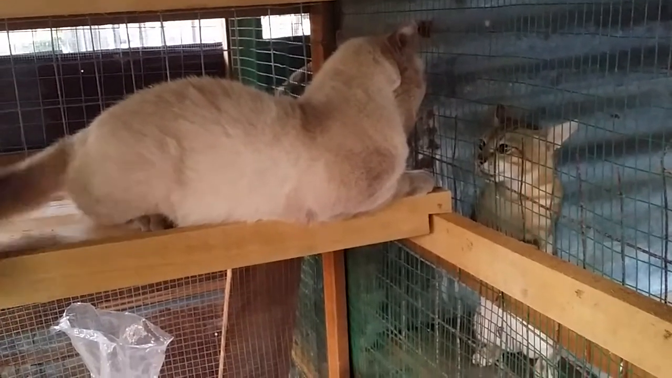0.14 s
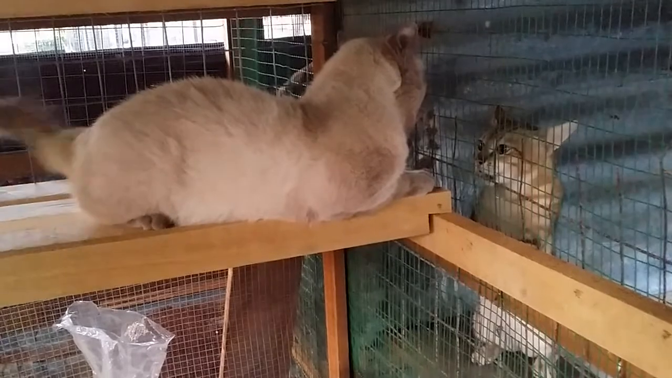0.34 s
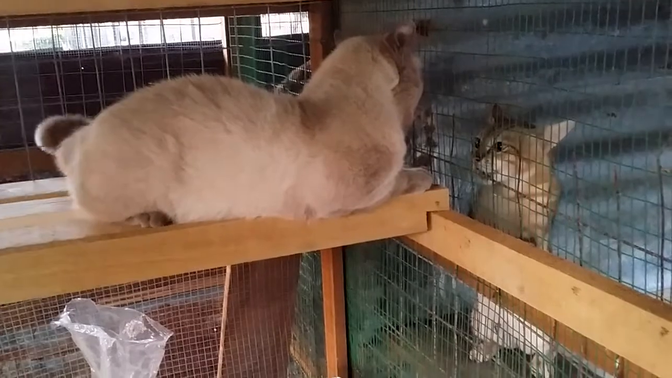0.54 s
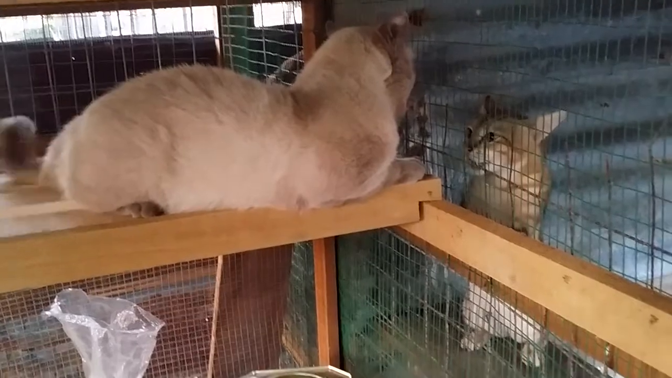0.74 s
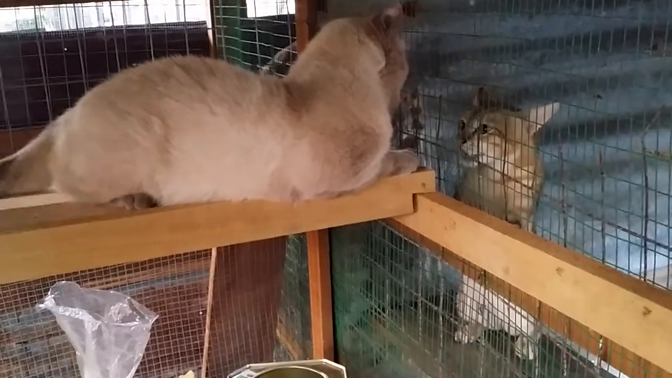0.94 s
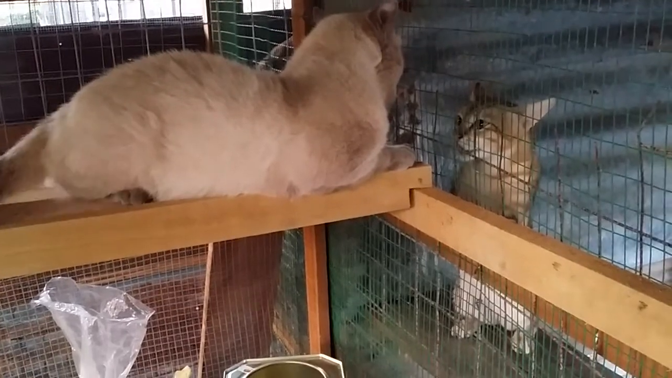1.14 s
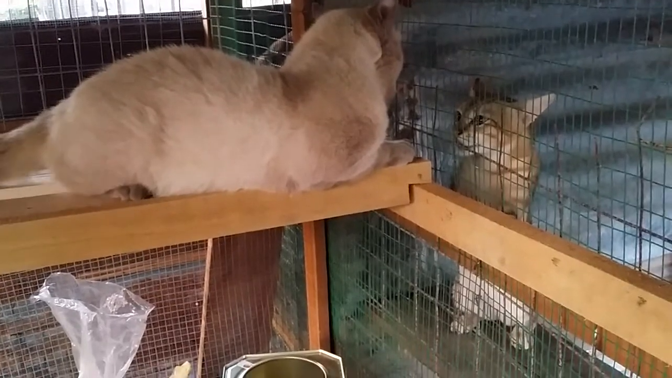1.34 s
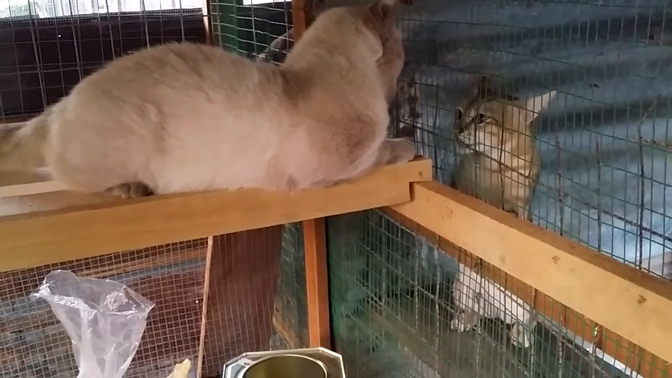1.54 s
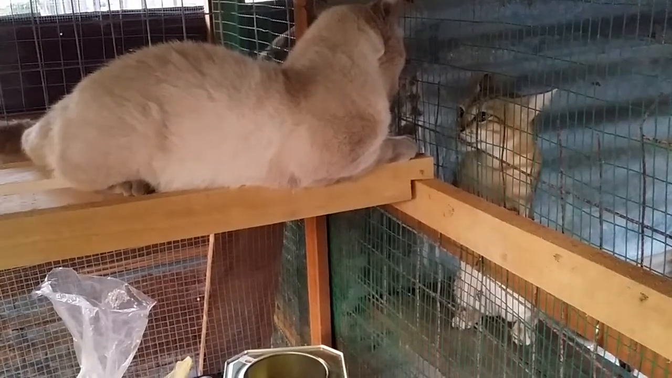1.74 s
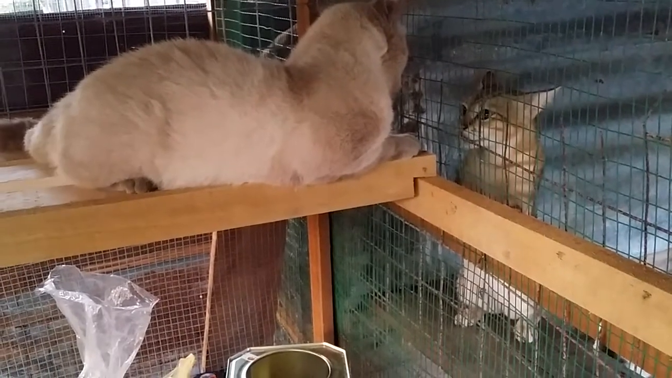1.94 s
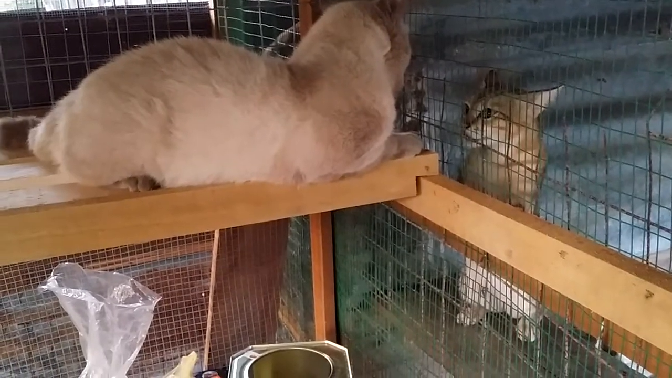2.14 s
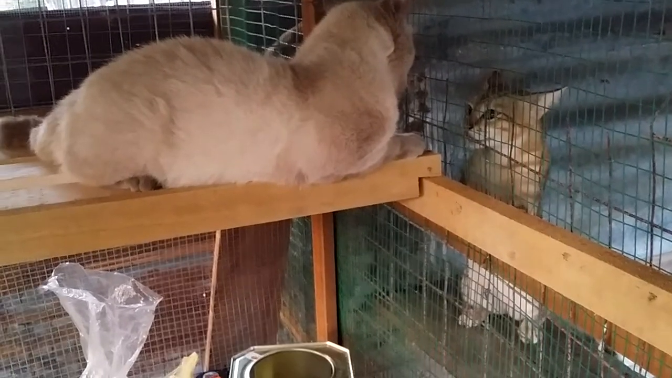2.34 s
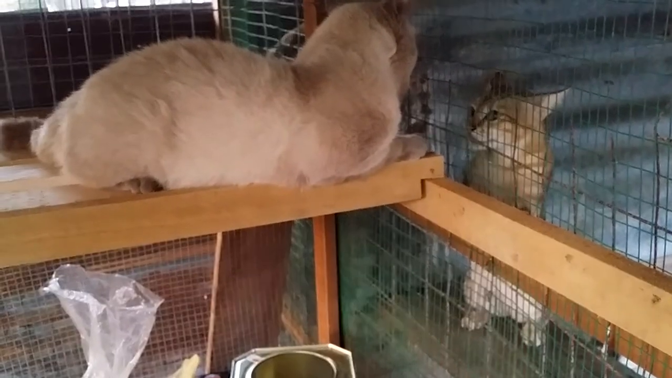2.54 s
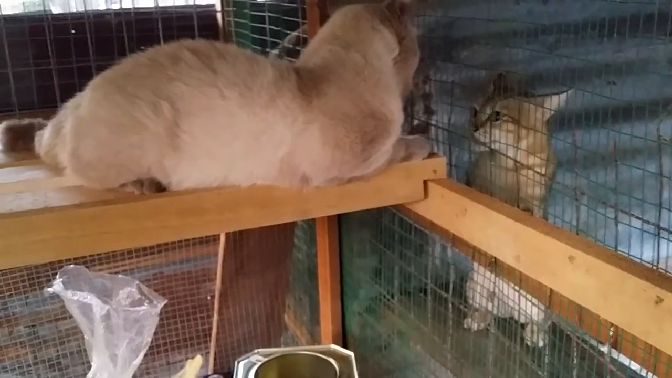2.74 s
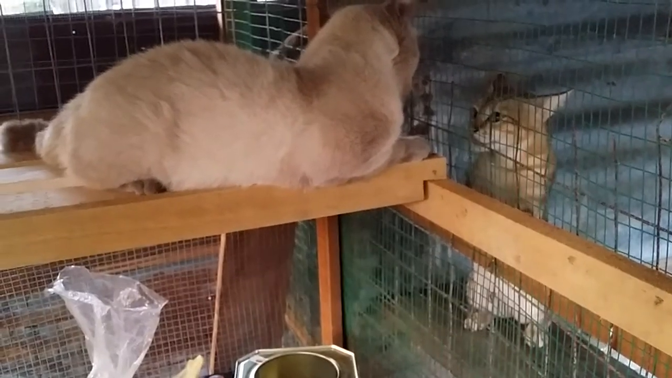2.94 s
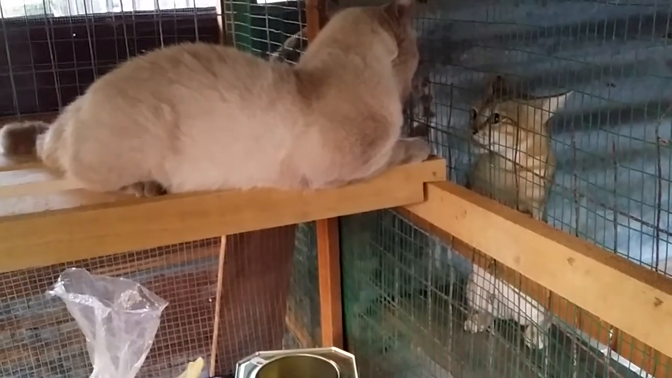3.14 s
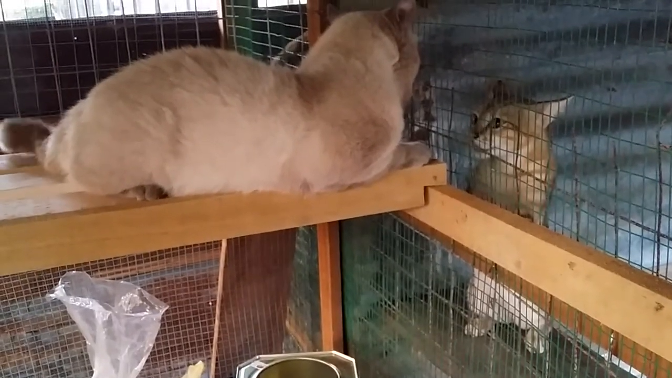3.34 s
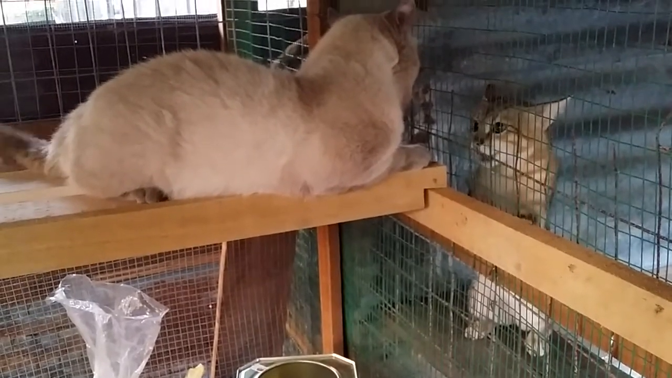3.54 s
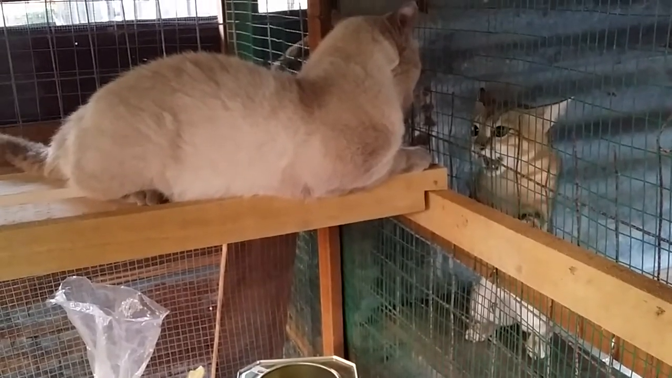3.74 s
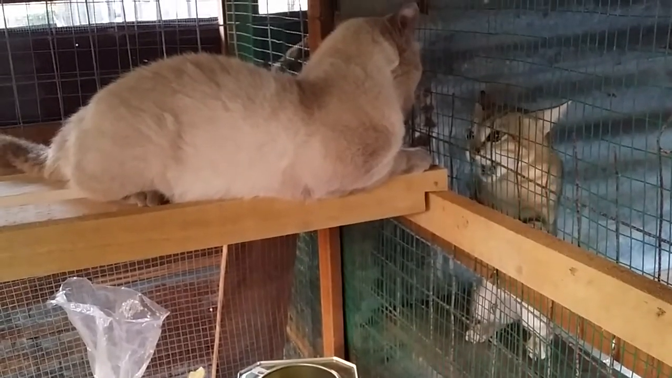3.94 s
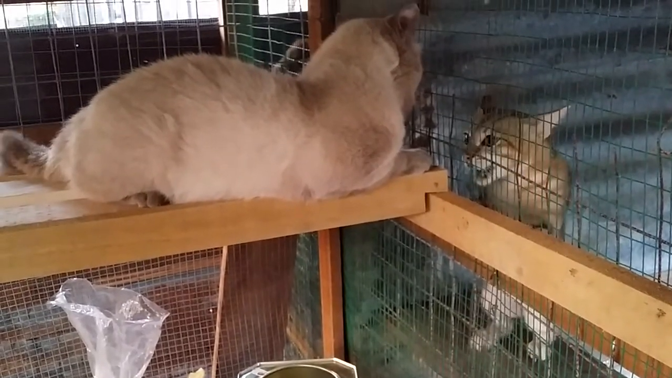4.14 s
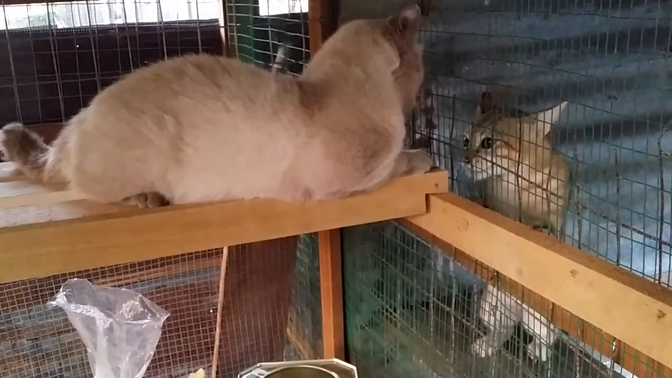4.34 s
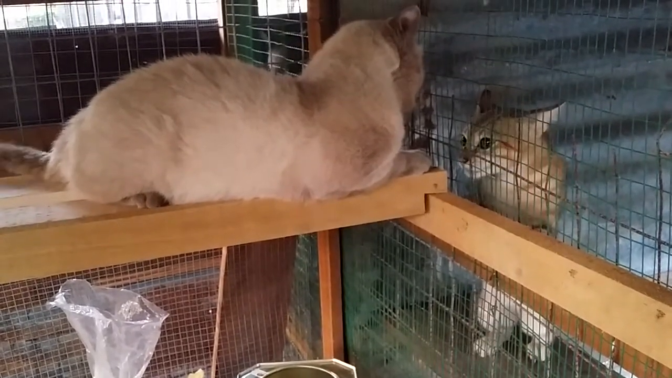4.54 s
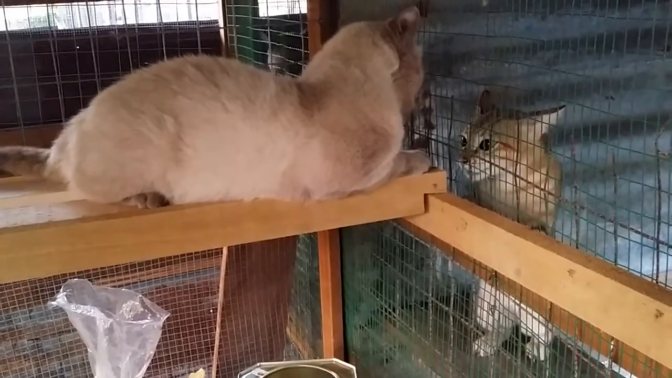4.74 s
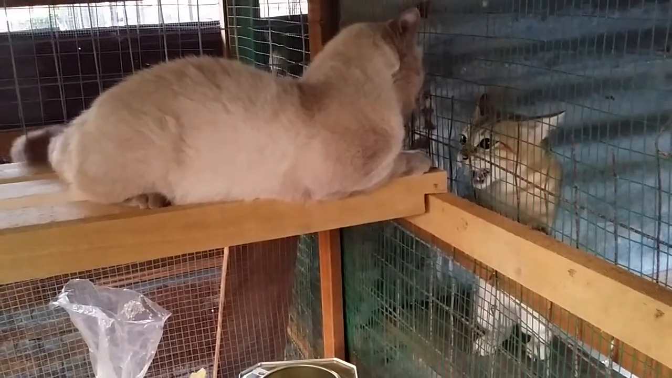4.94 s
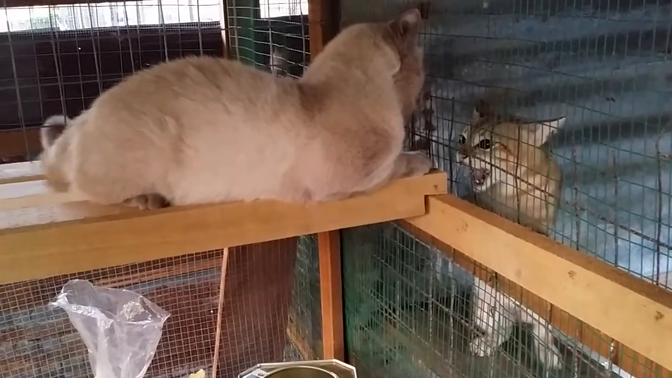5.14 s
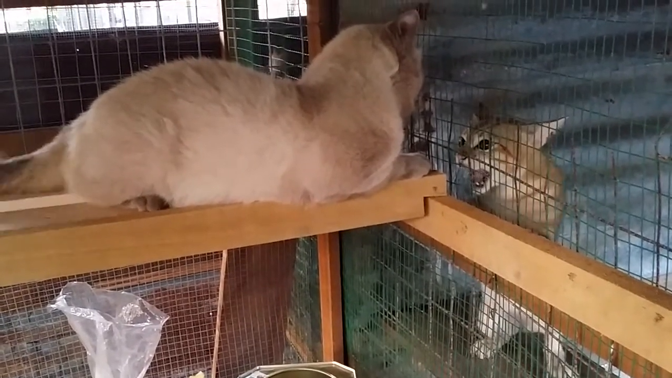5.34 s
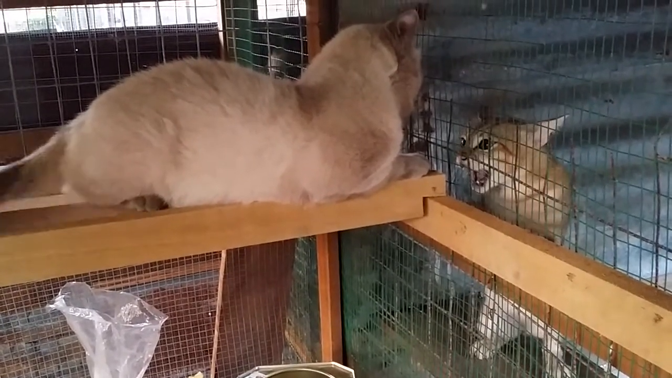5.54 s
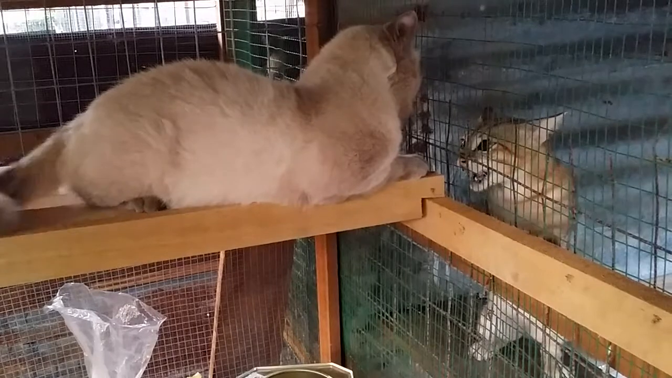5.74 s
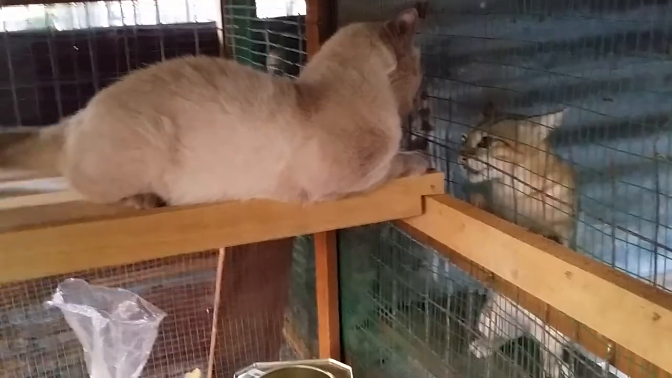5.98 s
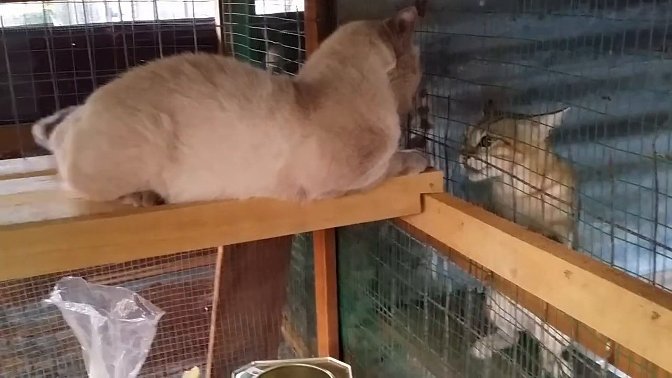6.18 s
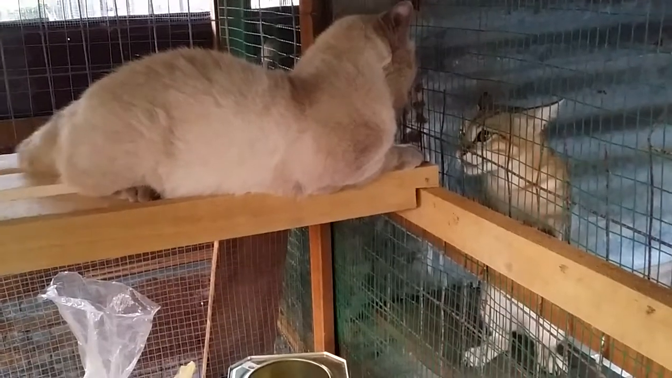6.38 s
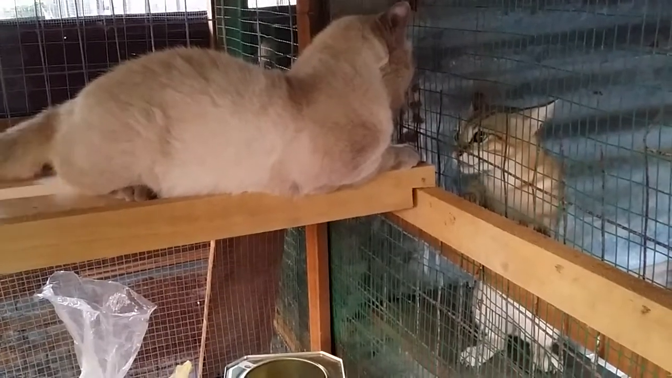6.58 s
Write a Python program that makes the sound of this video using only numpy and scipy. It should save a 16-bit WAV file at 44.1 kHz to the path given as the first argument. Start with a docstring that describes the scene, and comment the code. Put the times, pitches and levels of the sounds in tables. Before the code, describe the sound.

Three angry cat yowls are heard close by, separated by pauses in which grainy rustles and one soft tick can be made out. Each cry opens bright and raspy, bends in pitch and fades as the mouth closes. A far bird whistles thinly three times. Short, boxy reflections with a faint metallic ring; a nearby stereo microphone also picks up steady hiss and wavering bass rumble.

```python
"""Hiss and a low rumble run throughout: noise whose bass swells and sinks at random.
A cat yowls at a rival in a pen of wood, wire and sheet metal: pitched harmonics through a moving mouth.
The yowl opens into a bright, partly harsh "aow" and closes into a soft hoot; grainy noise rustles.
A noise tick follows, then a far bird chirps thinly (gliding sine), as it does twice more later.
A second yowl comes, then a third that again closes into a hoot; rustles go on between and after."""
import sys
import numpy as np
from scipy import signal
from scipy.fft import rfft, irfft, next_fast_len
from scipy.io import wavfile
from scipy.ndimage import uniform_filter1d

SR = 44100
rng = np.random.default_rng(int(sys.argv[2]) if len(sys.argv) > 2 else 0)


def wav_out(sig):
    """Save sig, one row per channel (or a flat mono array), as 16-bit PCM at SR to the path in sys.argv[1]."""
    wavfile.write(sys.argv[1], SR, np.round(np.clip(np.atleast_2d(sig).T, -1, 1) * 32767).astype(np.int16))


N = 291501
TIME = np.arange(N) / SR
CUTOFF_HZ = 15450

# mean fold pitch of each yowl, also steers the mouth: (time [s], pitch [Hz])
PITCH_1 = [(.35, 408.4), (.377, 411.7), (.4, 451), (.45, 480), (0.541, 502), (.62, 513), (0.698, 504.2),
           (0.909, 522.7), (.955, 570), (0.989, 586), (1.13, 527.6), (1.195, 519)]
PITCH_2 = [(3.459, 423.3), (3.484, 395), (3.525, 476), (3.56, 527), (3.595, 550.4), (3.63, 560.5),
           (3.669, 601.7), (3.715, 608), (3.78, 571.5), (3.83, 591), (3.881, 608), (3.939, 599),
           (3.978, 568), (4.259, 571)]
PITCH_3 = [(4.852, 519.5), (4.936, 604), (4.975, 688.5), (5.025, 701.4), (5.085, 756), (5.14, 757.7),
           (5.195, 756.7), (5.239, 712.7), (5.324, 704.8), (5.44, 617.5), (5.5, 609.9), (5.56, 572),
           (5.629, 550.2), (5.799, 538), (5.88, 527), (5.93, 584.7), (5.99, 555.6), (6.06, 500),
           (6.17, 483), (6.26, 420.4)]


def from_db(db):
    """Decibels to gain."""
    return 10 ** (np.asarray(db) / 20)


def rms_one(x):
    """Scale to unit power."""
    return x / np.sqrt(np.mean(x ** 2) + 1e-20)


def short_rms(x):
    """Level over about 10 ms."""
    return np.sqrt(np.maximum(uniform_filter1d(x ** 2, size=441), 0) + 1e-12)


def in_time(rows, t):
    """Each column of a curve, read at the values t of its first column."""
    s, *columns = np.transpose(rows)
    return [np.interp(t, s, column) for column in columns]


def at_hz(points, hz):
    """Read a spectrum on a log-frequency axis."""
    freqs, values = np.transpose(points)
    return np.interp(np.log(hz), np.log(freqs), values)


def band(x, low_hz, high_hz):
    """Gentle band-pass."""
    edges_hz = [low_hz, min(high_hz, .45 * SR)]
    return signal.sosfilt(signal.butter(2, edges_hz, "band", fs=SR, output="sos"), x)


def drift(rate_hz, size):
    """Random wander of spread 1: noise through a double pole near rate_hz, on a grid of 20 samples."""
    pole = np.exp(-2 * np.pi * rate_hz * 20 / SR)
    white = rng.standard_normal(size // 20 + 4002)
    slow = signal.lfilter([1], [1, -2 * pole, pole * pole], white)[4000:]  # drop the run-in
    return np.interp(np.arange(size) / 20, np.arange(len(slow)), rms_one(slow))


def delayed(x, ms):
    """The signal a little later."""
    return np.interp(TIME - ms / 1000, TIME, x, left=0)


def coloured_noise(spectrum):
    """Stereo noise of the given colour, alike in both channels in the bass; rms 1."""
    # left-right likeness: (frequency [Hz], correlation [-1 to 1])
    likeness = [(60, 1), (150, 0.91), (300, 0.9), (700, 0.17), (1500, 0.082), (5000, .05)]
    size = next_fast_len(N)
    hz = np.maximum(np.fft.rfftfreq(size, 1 / SR), 1)
    mid, side = rfft(rng.standard_normal((2, size)))
    alike = np.clip(at_hz(likeness, hz), -1, 1)
    pair = np.sqrt(1 + alike) * mid + np.sqrt(1 - alike) * side * [[1], [-1]]
    return rms_one(irfft(pair * from_db(at_hz(spectrum, hz)), size)[:, :N])


def cat(voice_db=1.37, air_db=-41, rasp_db=-9, left_lag_ms=0.085):
    """Voice, rasp and rushing air; voice and rasp reach each microphone directly and off near boards."""
    # effort: (time [s], level before voice_db [dB], extra tilt [dB/octave])
    loudness_1 = [(0.35, -33, 4.7), (0.38, -26.5, 4.2), (0.394, -34, 4), (0.448, -29, -2.5),
                  (0.458, -23.5, -1), (0.632, -26.5, 3.3), (0.9, -26.5, 2.6), (1.022, -39.5, 2.3),
                  (1.195, -46, 11)]
    loudness_2 = [(3.457, -39.5, 0.27), (3.497, -28.5, 0.33), (3.511, -32.5, 0.3), (3.597, -16.5, 0.55),
                  (3.647, -21, 0.9), (3.973, -20.5, 0.24), (3.999, -16.5, 0.19), (4.039, -21.5, 0.3),
                  (4.069, -16, 0.29), (4.177, -26.5, 0.25), (4.193, -20.5, 0.32), (4.255, -41, 0.3)]
    loudness_3 = [(4.848, -22, -0.63), (4.862, -18, -0.5), (4.914, -23, -0.5), (4.942, -18, -0.77),
                  (5.204, -14.5, -0.6), (5.328, -17, -0.28), (5.34, -15, -0.43), (5.51, -12, -0.8),
                  (5.558, -17.5, -0.64), (5.582, -15, -0.85), (5.864, -24.5, 0.23), (5.994, -38.5, -0.4),
                  (6.214, -39, -0.5), (6.275, -47, -0.5)]
    # jaw sway: (time [s], factor on first resonance, factor on second resonance)
    jaw_1 = [(.35, 0.83, 0.9), (.42, 1.12, 0.94), (.5, 1, 0.99), (.62, 1.07, 1.014), (.76, 0.88, 1.096),
             (.92, 0.88, 0.99)]
    jaw_2 = [(3.47, 0.8, 1.01), (3.56, 0.94, 0.83), (3.66, 1.04, 0.96), (3.8, 0.89, 1.026),
             (3.92, 0.9, 1.08), (4.0, 0.98, 0.91), (4.12, 1, 0.92)]
    jaw_3 = [(4.85, 0.92, .96), (4.95, 1.074, 0.97), (5.04, 0.97, 1.015), (5.17, 1.04, 0.89),
             (5.26, 1, 1.06), (5.36, 1.03, 1.04), (5.48, 1.073, 0.99), (5.62, 0.93, 1.007),
             (5.8, 0.96, 1.02)]
    # mouth gestures: (lips begin to close [s], lips shut [s], resonance factor, antiresonance factor,
    # then with shut lips: second resonance [Hz], antiresonance [Hz], tilt [dB/octave])
    gestures = [(0.894, 0.972, 0.99, 0.94, 2180, 1750, 2.3), (4.09, 4.34, 1, 0.98, 2500, 3960, -8.5),
                (5.681, 5.944, 1.02, 1.059, 2800, 2790, 1.3)]
    # extra weight of the lowest harmonic, one per yowl: [dB]
    fundamentals_db = [4, 2, -0.4]
    # board reflections: (delay [ms], gain)
    left_echoes = [(2.063, 0.22), (2.222, -0.28), (3.605, -0.11), (3.855, -0.013), (4.49, -0.17),
                   (5.782, -0.14), (6.122, 0.23), (6.916, -0.17), (7.12, -0.098)]
    right_echoes = [(0.317, 0.2), (0.476, -0.12), (1.224, 0.36), (1.383, -0.13), (1.973, 0.32),
                    (2.585, -0.27), (2.993, 0.18), (4.263, -0.2), (9.773, 0.35)]
    # air rushing through the open mouth: (frequency [Hz], relative density [dB per Hz])
    mouth_air = [(600, -24.5), (1800, -7), (3700, 1.5), (4850, 6), (6000, 2.5), (7600, 3.5), (10500, -3.5),
                 (13500, -2.5), (16000, -43)]

    calls = zip(
        (PITCH_1, PITCH_2, PITCH_3),
        (loudness_1, loudness_2, loudness_3),
        (jaw_1, jaw_2, jaw_3),
        gestures,
        fundamentals_db,
    )
    voice = from_db(voice_db) * sum(yowl(*call) for call in calls)
    strength = np.maximum(uniform_filter1d(np.abs(voice), size=400), 0)
    voice = voice + from_db(rasp_db) * strength * strain(TIME) ** 2 * rasp()

    left = voice + sum(gain * delayed(voice, ms) for ms, gain in left_echoes)
    right = voice + sum(gain * delayed(voice, ms) for ms, gain in right_echoes)
    # echoes colour the voice; a gain then evens its short-term level, so loudness is as heard at the microphones
    even = short_rms(voice) / short_rms(np.hypot(left, right) / np.sqrt(2))
    left, right = even * left, even * right

    # air grows more slowly than the voice
    air = from_db(air_db) * np.sqrt(strength) * coloured_noise(mouth_air)
    return np.array([delayed(left, left_lag_ms), right]) + air


def yowl(pitches, loudness, jaw, gesture, fundamental_db, waver=0.00392, jitter=0.035, doubling=0.0034,
         shimmer_db=1.5, flutter_db=2.0, attack_s=.01, release_s=0.009):
    """Harmonics of the vocal folds shaped by the moving mouth; strain makes the cycles uneven."""
    # fixed colour of throat and head, with higher resonances: (frequency [Hz], gain [dB])
    throat = [(450, -2), (650, -3.5), (800, -6), (1100, 3), (1600, -.6), (2300, -4), (2900, -4.3),
              (3600, 3.5), (4200, 6), (4750, 19), (5400, 11), (7200, 25), (8800, 17), (10800, 12),
              (13500, 28)]
    first_width_hz, second_width_hz = 352, 590
    notch_db, notch_width_share = -22, 0.093
    lips_db, open_mouth_hz = -24, 1950
    pulse_spread_rad = .55

    start, end = loudness[0][0] - attack_s, loudness[-1][0] + release_s
    span = (TIME > start) & (TIME < end)
    t = TIME[span]
    size = len(t)
    pitch_hz, = in_time(pitches, t)
    level_db, extra_tilt = in_time(loudness, t)
    first_hz, second_hz, notch_hz, tilt = mouth(t, pitch_hz, jaw, gesture)

    rough = strain(t)
    wander = waver * drift(25.8, size) + jitter * rough * drift(200, size)
    cycles = np.cumsum(pitch_hz * (1 + wander)) / SR
    # strained folds alternate long and short cycles: lines between the harmonics
    cycles = cycles + doubling * rough ** 2 * np.sin(np.pi * cycles + drift(21.4, size))

    closure = np.clip(1 - first_hz / open_mouth_hz, 0, 1)
    voice, power = 0, 0
    for k in range(1, 29):
        hz = k * pitch_hz
        mouth_db = resonance_db(hz, first_hz, first_width_hz) + resonance_db(hz, second_hz, second_width_hz)
        # a side cavity swallows harmonics near its antiresonance
        cavity_db = notch_db * np.exp(-((hz / notch_hz - 1) / notch_width_share) ** 2)
        # closing lips muffle what lies above the second resonance
        muffle_db = lips_db * closure * np.clip((hz - second_hz) / second_width_hz, 0, 1)
        source_db = (tilt + extra_tilt) * np.log2(k) + fundamental_db * (k == 1)
        gain_db = at_hz(throat, hz) + mouth_db + cavity_db + muffle_db + source_db
        gain = from_db(gain_db + flutter_db * drift(16.6, size)) * (hz < CUTOFF_HZ)
        # each resonance turns the phase by half a cycle as a harmonic crosses it
        turn = np.arctan(2 * (hz - first_hz) / first_width_hz)
        turn = turn + np.arctan(2 * (hz - second_hz) / second_width_hz)
        # gradual fold closure spreads each pulse over its cycle
        turn = turn + pulse_spread_rad * k ** 2
        voice = voice + gain * np.cos(2 * np.pi * k * cycles - turn)
        power = power + gain ** 2 / 2

    gate = np.clip((t - start) / attack_s, 0, 1) * np.clip((end - t) / release_s, 0, 1)
    shimmer = shimmer_db * rough * drift(150, size)
    out = np.zeros(N)
    out[span] = voice / np.sqrt(power) * gate * from_db(level_db + shimmer)
    return out


def resonance_db(hz, centre_hz, width_hz):
    """Response of one resonance of the mouth: flat below, falling above."""
    return -10 * np.log10((1 - (hz / centre_hz) ** 2) ** 2 + (hz * width_hz / centre_hz ** 2) ** 2)


def mouth(t, pitch_hz, jaw, gesture):
    """Two resonances, antiresonance and tilt: they follow the pitch until the lips close to a hoot."""
    # open mouth, before sway and factors: (pitch [Hz], first resonance [Hz], second resonance [Hz],
    # antiresonance [Hz], source tilt [dB/octave])
    mouth_shapes = [(387, 680, 2550, 4400, -1), (468, 1700, 2450, 4500, 1.6), (518, 1540, 2325, 4240, 3.2),
                    (570, 2030, 2960, 4290, 2), (643, 2246, 3380, 4240, 0.5), (687, 2305, 3830, 4230, -3.5),
                    (757, 2280, 4500, 4640, -1.34)]
    jaw_lag_s = 0.086  # the jaw sets the first resonance and trails the pitch
    shut_first_hz = 670
    closing_power = 1.77  # slow at first, then fast

    closing_s, shut_s, factor, notch_factor, *shut = gesture
    keep = np.exp(-1 / (jaw_lag_s * SR))
    trailing_hz = pitch_hz[0] + signal.lfilter([1 - keep], [1, -keep], pitch_hz - pitch_hz[0])
    first_hz = in_time(mouth_shapes, trailing_hz)[0]
    second_hz, notch_hz, tilt = in_time(mouth_shapes, pitch_hz)[1:]
    first_sway, second_sway = in_time(jaw, t)
    opened = [first_hz * first_sway * factor, second_hz * second_sway * factor, notch_hz * notch_factor, tilt]
    closed = np.clip((t - closing_s) / (shut_s - closing_s), 0, 1) ** closing_power
    return [a + closed * (b - a) for a, b in zip(opened, [shut_first_hz, *shut])]


def strain(t):
    """Fold roughness, 0-1: slack folds beat unevenly and steady as pitch climbs; each rasp adds to it."""
    # voice breaks: (centre time [s], half length to 1/e [s], added roughness [0-1])
    breaks = [(.48, 0.083, 0.18), (3.524, 0.032, 0.3), (3.64, 0.057, 0.36), (3.756, 0.059, 0.39),
              (4.983, 0.047, 0.37), (5.205, 0.012, 0), (5.342, 0.011, 0.16), (5.849, .04, 0.13)]
    slack_hz, slack_roughness, steadying_power = 385, 0.92, 4.4
    pitch_hz, = in_time(np.vstack([PITCH_1, PITCH_2, PITCH_3]), t)
    slack = slack_roughness * (slack_hz / pitch_hz) ** steadying_power
    added = sum(amount * np.exp(-((t - s) / length_s) ** 2) for s, length_s, amount in breaks)
    return np.clip(slack + added, 0, 1)


def rasp():
    """Chaotic bursts from the folds ring in the throat; rms 1."""
    # throat modes: (centre [Hz], width [Hz], relative level [dB])
    rasp_modes = [(1600, 87, -50), (2200, 150, 14), (3020, 120, -13.5), (4480, 300, 8.5), (7500, 760, 1.5)]
    bursts = rng.standard_normal(N) * from_db(3.5 * drift(200, N))
    out = 0
    for hz, width_hz, level_db in rasp_modes:
        out = out + from_db(level_db) * rms_one(band(bursts, hz - width_hz / 2, hz + width_hz / 2))
    return rms_one(out)


def pen_noises(spread=1.71, grain_db=2.5, tick_t60_s=0.26):
    """Rustles are swells of grainy band noise; the tick is a decaying noise burst."""
    # rustles: (centre time [s], half length [s], level before swell [dB], centre [Hz])
    rustles = [(1.237, 0.068, -46.5, 4760), (1.455, 0.045, -51.5, 2120), (2.137, 0.033, -51, 1740),
               (2.473, 0.049, -51, 1980), (2.893, 0.33, -51.5, 1130), (3.074, 0.027, -48.5, 2170),
               (3.394, 0.061, -50, 2580), (4.587, 0.046, -52.5, 4000), (4.69, 0.2, -56.5, 2210),
               (6.18, 0.051, -51, 4750), (6.3, 0.039, -53, 3670)]
    # tick: (time [s], initial noise level before the band-pass [dB])
    ticks = [(1.668, -40.5)]
    out = np.zeros((2, N))
    white = rng.standard_normal((2, N))
    grainy = white * from_db(grain_db * drift(110, N))
    for s, half_s, level_db, hz in rustles:
        span = np.abs(TIME - s) < half_s
        swell = np.cos(np.pi / 2 * (TIME[span] - s) / half_s) ** 2
        noise = rms_one(band(grainy[:, span], hz / spread, hz * spread))
        out[:, span] += from_db(level_db) * swell * noise
    for s, level_db in ticks:
        decay = (TIME > s) * from_db(level_db - 60 * np.abs(TIME - s) / tick_t60_s)
        out += band(white * decay + 1e-18, 400, 7900)
    return out


def bird(warble=0.0099):
    """A thin arched whistle about every two seconds: a sine with gliding, warbling pitch."""
    # arched note: (unstretched time [s], pitch at full rise [Hz], relative level [dB])
    note = [(0, 4850, -15), (.032, 4910, -15), (.101, 5040, -5.5), (.124, 5450, 2), (.147, 6030, 3),
            (.185, 5650, -18), (.225, 5000, -24)]
    # chirps: (start [s], level [dB], stretch in time, share of the full rise)
    chirps = [(1.925, -54.5, 0.83, .9), (4.11, -48.5, 0.54, 0.93), (5.84, -53.5, 1, 0.68)]
    out = np.zeros(N)
    base_hz = note[0][1]
    for start, level_db, stretch, rise in chirps:
        span = (TIME > start) & (TIME < start + stretch * note[-1][0])
        hz, note_db = in_time(note, (TIME[span] - start) / stretch)
        hz = base_hz + rise * (hz - base_hz)
        cycles = np.cumsum(hz * (1 + warble * drift(220, len(hz)))) / SR
        out[span] += from_db(level_db + note_db) * np.sin(2 * np.pi * cycles)
    return out


def background(level_db=-44.5, lumps_db=-2.0, lumps_hz=5.4, rumble_pan_db=-1.8):
    """Steady outdoor hiss over a rumble that swells and sinks at random."""
    # outdoor noise: (frequency [Hz], relative density [dB per Hz])
    ambience = [(25, -23.5), (50, -7), (70, -1.5), (115, 0), (180, -5.5), (250, -11.5), (320, -9),
                (450, -15), (1000, -19), (3200, -33), (6000, -32.5), (7800, -29.5), (11000, -39.5),
                (15500, -42.5)]
    noise = from_db(level_db) * coloured_noise(ambience)
    rumble = signal.sosfilt(signal.butter(1, 300, fs=SR, output="sos"), noise)
    hiss = noise - rumble
    gain_db = lumps_db * drift(lumps_hz, N) + rumble_pan_db * np.array([[1], [-1]])
    return hiss + rumble * from_db(gain_db)


def reverberate(x, t60_s, wall_cut_hz):
    """Dense, dying reflections, different at each microphone: convolution with decaying noise."""
    t = TIME[:int(t60_s * SR)]
    tail = band(rng.standard_normal((2, len(t))), 280, wall_cut_hz)
    tail = tail * from_db(-60 * t / t60_s) * (t > .006)
    return signal.fftconvolve(x, tail / np.sqrt(np.sum(tail ** 2) / 2), axes=1)[:, :N]


def scene(pen_db=-19, bird_echo_db=3, sheet_db=-20):
    """Cat and rustles in the pen, the bird among distant echoes, the background."""
    near = cat() + pen_noises()
    pen = from_db(pen_db) * reverberate(near, t60_s=.2, wall_cut_hz=4500)
    # the sheet metal wall rings on faintly in a narrow band
    sheet = from_db(sheet_db) * reverberate(band(near, 896, 1032), t60_s=0.42, wall_cut_hz=3300)
    far = np.array([bird()] * 2)
    far_echoes = from_db(bird_echo_db) * reverberate(far, t60_s=0.29, wall_cut_hz=8500)
    return near + pen + sheet + far + far_echoes + background()


def record(dry, port_hz=8200, port_q=3.14, port_gain=0.51):
    """The right microphone port rings in the treble; the top is cut steeply."""
    left, right = dry
    right = right + port_gain * signal.lfilter(*signal.iirpeak(port_hz, port_q, fs=SR), right)
    return signal.sosfilt(signal.ellip(10, .1, 80, CUTOFF_HZ, fs=SR, output="sos"), [left, right])


dry = scene()
out = record(dry)
wav_out(out)
```